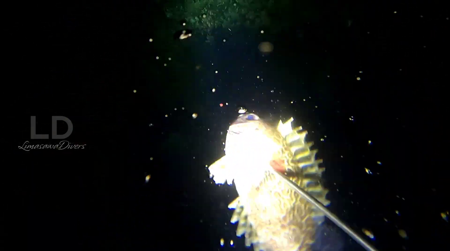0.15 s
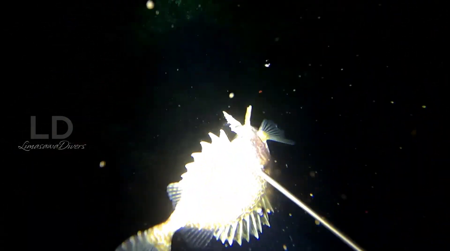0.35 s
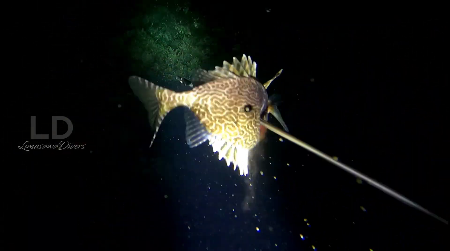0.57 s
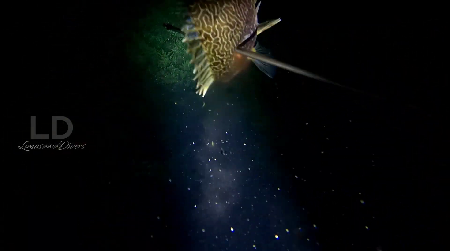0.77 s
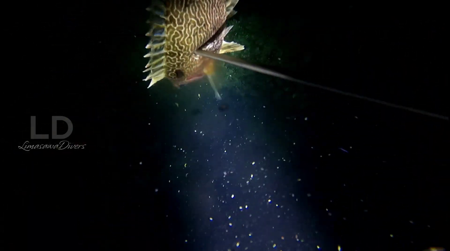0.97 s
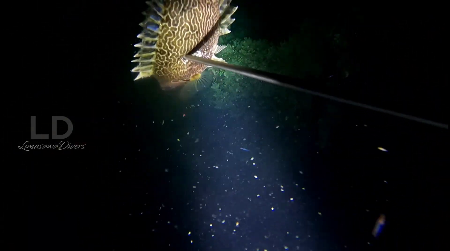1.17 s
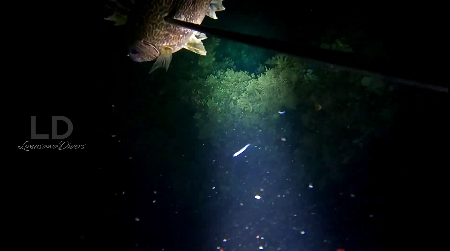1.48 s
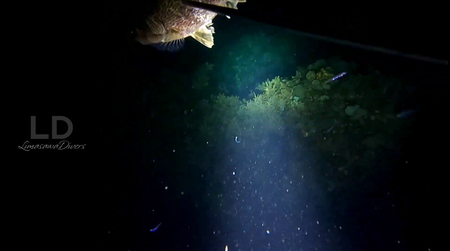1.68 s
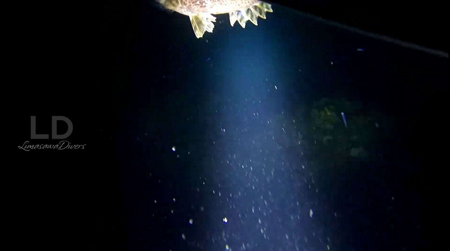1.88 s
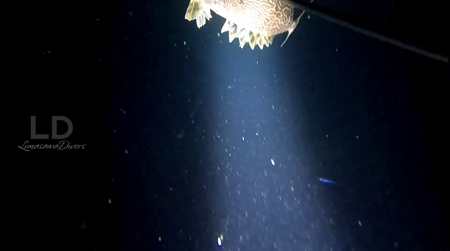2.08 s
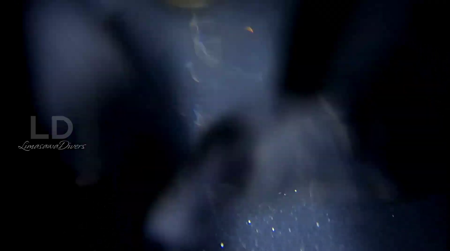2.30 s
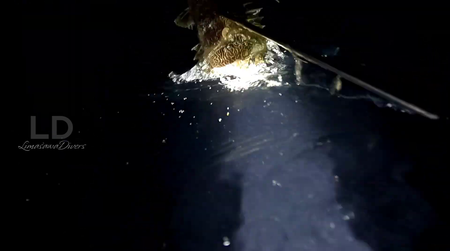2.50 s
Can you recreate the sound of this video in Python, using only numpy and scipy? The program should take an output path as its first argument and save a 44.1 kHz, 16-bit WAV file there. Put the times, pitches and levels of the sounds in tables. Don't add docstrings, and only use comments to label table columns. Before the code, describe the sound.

Close, dull underwater handling noise: deep swelling rumble and bubbles first, quiet fizz with scattered ticks in the middle, then quick squeaky rubs, hollow glugs, a lull and crisp wet pops as the surface breaks.

```python
import sys
import numpy as np
from scipy import signal
from scipy.fft import rfft, irfft, next_fast_len
from scipy.io import wavfile
from scipy.ndimage import map_coordinates

SR = 44100
rng = np.random.default_rng(int(sys.argv[2]) if len(sys.argv) > 2 else 0)


def attenuation_scalar(level_db):
    decades = np.asarray(level_db, float) / 20
    return 10 ** decades


def unload_audio(sound):
    columns = np.transpose(np.atleast_2d(sound))
    steps = np.round(np.clip(columns, -1, 1) * 32767)
    wavfile.write(sys.argv[1], SR, steps.astype(np.int16))


N = 116865
T = np.arange(N) / SR

# [t/s, fizz level/dB, air pocket over fizz/dB, slosh over fizz/dB]
WASH = [(0, -52.5, -2, -22), (.08, -53.5, -5, -29), (.2, -46, -11, -16), (.3, -48, -13, -20),
        (.45, -54, -13.5, -22), (.78, -57.5, -8.5, -22), (1.0, -58, -20, -27.5), (1.45, -55.5, -30.5, -28),
        (1.68, -51.5, -14, -14), (1.78, -54, -22, -34), (1.95, -52, -3.5, -4.5), (2.04, -55.5, -17, -17),
        (2.12, -58, -12.5, -15), (2.2, -61, -33, -28.5), (2.48, -62, -29, -32), (2.6, -54, -15, -17.5)]
SNAP_T60_S = 0.013


def unit(x):
    return x / np.sqrt(np.mean(x ** 2) + 1e-20)


def along(points, hz):
    f, value = np.transpose(points)
    return np.interp(np.log(hz + 1), np.log(f + 1), value)


def curves(rows):
    s, *columns = np.transpose(rows)
    return [np.interp(T, s, column) for column in columns]


def wobble(rate, size=N):
    return map_coordinates(rng.standard_normal(N // 8), [np.arange(size) * rate / SR])


def filtered(x, response):
    m = next_fast_len(N + SR // 2)
    return irfft(rfft(x, m) * response(np.fft.rfftfreq(m, 1 / SR)), m)[..., :N]


def modes(x, table):
    def response(f):
        total = 0
        for k, (center, width, db) in enumerate(table):
            damping = 1j * f * width
            total = total + (-1) ** k * attenuation_scalar(db) * damping / (center * center - f * f + damping)
        return total
    return filtered(x, response)


def add(track, s, sound):
    part = track[..., round(s * SR):][..., :sound.shape[-1]]
    part += sound[..., :part.shape[-1]]


def stroke(length, edge_s):
    t = np.arange(round(length * SR)) / SR
    return t, np.clip(np.minimum(t, length - t) / edge_s, 0, 1)


def swell():
    # [t/s, level/dB]
    swell_levels = [(0, -27), (.13, -34.5), (.21, -15.5), (.46, -17.5), (.58, -39.5), (.7, -28.5),
                    (.8, -36), (1.0, -26), (1.22, -31.5), (1.35, -22.5), (1.47, -29), (1.55, -20),
                    (1.73, -15.5), (1.82, -23), (1.95, -17), (2.07, -36), (2.3, -31.5), (2.65, -32.5)]
    pitch_hz = 31 * (1 + 0.2 * wobble(16))
    tone = np.sqrt(2) * np.sin(2 * np.pi * np.cumsum(pitch_hz) / SR)
    membrane = [(31.2, 22.0, 0)]
    lumps = unit(modes(modes(rng.standard_normal(N), membrane), membrane))
    return attenuation_scalar(curves(swell_levels)[0] + 1.64 * wobble(36.25)) * (tone + attenuation_scalar(-9) * lumps)


def crackling_wash():
    t = np.arange(SR // 16) / SR
    grains_per_s, spread_db, tint_db = 290, 2.5, 5
    spikes = (rng.random(N) < grains_per_s / SR) * attenuation_scalar(spread_db * rng.exponential(size=N))
    tint = attenuation_scalar(tint_db * np.array([wobble(74), wobble(59.75), wobble(66.0)]))
    grains = signal.fftconvolve(spikes, attenuation_scalar(-90 * t / SNAP_T60_S))[:N] * tint
    envelope = attenuation_scalar(1.7 * wobble(24.86)) + attenuation_scalar(-2) * unit(grains)
    wash = attenuation_scalar(curves(WASH)[0] + 7.0) * envelope * rng.standard_normal((3, N))
    wash[0] *= attenuation_scalar(-2 + 2 * wobble(18))
    return wash


def gurgle():
    # [f/Hz, width/Hz, level/dB]
    pocket = [(610, 108, 0), (765, 180, -2)]
    # [f/Hz, density level/dB per Hz]
    slosh_spectrum = [(26, -23), (45, -2), (52, -27), (64, -30), (205, -21.5), (550, -40.5), (720, -79),
                      (1210, -120)]
    # [t/s, level/dB, f/Hz, life/cycles]
    bubbles = [(0.137, -16.5, 1355, 4), (.15, -21, 665, 5.7), (.182, -21.5, 338, 17.4),
               (.193, -24, 670, 16), (0.199, -25.5, 1387, 37), (0.21, -26, 1350, 13),
               (0.33, -15.5, 680, 10.2), (.11, -29, 148, 4), (.333, -24, 1390, 15), (0.336, -17, 2830, 35),
               (0.775, -40, 1453, 32), (0.921, -33, 135, 1.7), (2.121, -26, 101, 1.9),
               (0.343, -19, 341, 13), (0.355, -26, 1418, 21), (.366, -27.5, 1500, 9),
               (0.379, -36, 1300, 12), (0.355, -20, 222.6, 15), (.366, -17.5, 317, 9.7),
               (0.411, -23.5, 313, 4.5), (.612, -36.5, 682, 17), (.615, -44.5, 1121, 46),
               (.718, -32.5, 706, 27), (1.076, -40.5, 161, 3.8), (1.601, -21.5, 189, 2.87),
               (1.65, -18, 300, 1.6), (1.657, -8.5, 270, 2.1), (1.662, -14.5, 330, 2.3),
               (1.669, -1, 586, 1.7), (1.681, -12.5, 57, 3.3), (1.85, -32, 300, 5.8),
               (1.897, -5, 437, 1.08), (1.903, -23, 117, 4.7), (2.516, -20, 4280, 24),
               (2.519, -34, 4100, 74), (2.549, -8.5, 5770, 27), (2.549, -21, 2760, 10),
               (2.549, -29, 149, 3.5), (2.554, -26.5, 460, 4.7), (2.623, -18.5, 1380, 6.4),
               (2.64, -32, 3210, 16.6)]
    fizz_db, pocket_db, slosh_db = curves(WASH)
    blip_db = 3

    blips = attenuation_scalar(blip_db * wobble(70)) * rng.standard_normal(N)
    hum = unit(modes(modes(blips, pocket), [(686, 1000, 0)]))
    out = attenuation_scalar(fizz_db + pocket_db + 13.5 + 3.1 * wobble(11)) * hum

    slosh = unit(filtered(rng.standard_normal(N), lambda f: attenuation_scalar(along(slosh_spectrum, f))))
    out += attenuation_scalar(fizz_db + slosh_db + 31.5 + blip_db * wobble(30.05)) * slosh

    for s, db, hz, cycles in bubbles:
        u = np.arange(round(2 * cycles / hz * SR)) / SR * hz
        envelope = attenuation_scalar(db - 26 * u / cycles) * (1 - np.exp(-u / 0.22)) ** 2
        rise = 1 + 0.01 * u / cycles
        add(out, s, envelope * np.sin(2 * np.pi * u * rise))
    return out


def impacts():
    # [t/s, peak level/dB, mid level/dB, treble level/dB]
    snaps = [(0.0426, -30.5, 17.5, 8.5), (0.12, -24.5, 7.5, 2), (0.2876, -34, 8.5, -12),
             (0.9899, -38, 8, 12), (1.3624, -44, 16.5, 14), (1.3912, -27.5, 10, -2.5),
             (1.6373, -27, 6, -19), (1.8489, -33, 9, -27), (1.8979, -17.5, -31, -16),
             (1.9847, -18, -2.5, 3.5), (2.5154, -20, -7, -8), (2.5485, -14, 5, -5.5), (2.609, -25, 0, -4)]
    # [t/s, peak level/dB, treble level/dB]
    ticks = [(0.0144, -38, 12), (0.0954, -31.5, -24), (0.1841, -27, -16), (0.3165, -34.5, 10),
             (0.3375, -18.5, 6), (0.5116, -48.5, 22), (0.6575, -40.5, 12), (0.7563, -45, 16.5),
             (0.8034, -34.5, 4), (0.8622, -35.5, 9), (1.078, -39.5, 10.5), (1.1071, -36.5, 8),
             (1.154, -41.5, 9.5), (1.1932, -39.5, 10.5), (1.4265, -35.5, 11.5), (2.021, -33, 9),
             (2.172, -35, 4.5), (2.23, -37.5, 6), (2.2563, -46, 19.5), (.0075, -48, 15.5), (.0762, -55, 14),
             (0.141, -28, 3), (0.2152, -39, 15), (0.29, -34, 6), (0.379, -42, 13), (.427, -46.5, 13),
             (0.4738, -48, 13.5), (.52, -36, 4), (.6434, -50, 16), (0.893, -50.5, 12), (.909, -53, 19),
             (0.9187, -50, 16), (0.9433, -44.5, 9.5), (0.964, -49, 17), (1.0435, -51, 17.5),
             (1.088, -39.5, 11.5), (1.1413, -43, 10.5), (1.2, -47, 13), (1.227, -34.5, -5),
             (1.2455, -52, 13), (1.344, -56, 22), (1.41, -37.5, 9), (1.615, -54, 19), (1.7384, -41, 6),
             (1.7624, -36, -1), (2.0497, -41.5, 4), (2.0956, -42.5, 8), (2.147, -52, 8), (2.279, -54, 17),
             (2.287, -55, 19.5), (2.335, -49, 13), (2.365, -49, 4), (2.373, -42.5, 5), (2.424, -43, 1),
             (2.58, -65, 10), (2.595, -47, -8)]
    force, t = np.zeros((4, N)), np.arange(SR // 16) / SR
    ring_db, ring_t60_s = -16, 0.05
    fade = attenuation_scalar(-60 * t / SNAP_T60_S) + attenuation_scalar(ring_db - 60 * t / ring_t60_s)
    blows = [*snaps, *[(s, db, high_db / 2, high_db) for s, db, high_db in ticks]]
    for s, db, mid_db, high_db in blows:
        gains = attenuation_scalar(db + 5 + np.array([[-high_db / 2], [0], [mid_db], [high_db]]))
        add(force, s, gains * fade * np.sign(rng.standard_normal(len(t))))
    return force


def rubs():
    # [t/s, length/s, level/dB, mid level/dB, treble level/dB]
    scrapes = [
        (0.174, 0.063, -48, -10, -27),
        (0.331, 0.012, -30.5, 1, -29),
        (1.506, 0.029, -38, 1.5, -11),
        (1.559, 0.017, -44.5, 3, -14),
        (1.575, 0.03, -43.5, 17.5, 7),
        (1.653, 0.023, -40.5, -8, 4),
        (1.659, .038, -31.5, -2.5, -21),
        (1.779, 0.057, -39.5, 12.5, 5),
        (1.927, 0.075, -53, -5, 0),
    ]
    force, edge = np.zeros((4, N)), 0.25
    for s, length, db, mid_db, high_db in scrapes:
        t, envelope = stroke(length * (1 + edge), length * edge)
        grit = attenuation_scalar(2.0 * wobble(582, size=len(t))) * rng.standard_normal((4, len(t)))
        gains = attenuation_scalar(db + 14.5 + np.array([[5], [0], [mid_db], [high_db]]))
        add(force, s - length * edge / 2, gains * envelope * grit)
    return force


def squeaks():
    # [t/s, length/s, level/dB, first f/Hz, last f/Hz]
    glides = [(0.399, 0.038, -51.5, 3000, 2980), (1.506, 0.0101, -21.5, 1734, 1540),
              (1.515, 0.021, -25, 1038, 1097), (1.57, 0.0163, -26, 3116, 2350),
              (1.572, 0.011, -26.5, 3076, 3567), (1.585, 0.01096, -18.5, 2257, 1273),
              (1.593, 0.01085, -18, 1283, 827), (1.599, 0.0091, -17.5, 729, 610),
              (1.663, 0.0101, -17.5, 1278, 1665), (1.66, 0.016, -37, 7470, 7240),
              (1.675, 0.02, -36, 6140, 7270), (1.777, 0.034, -24, 1417, 2026),
              (1.781, 0.0197, -25, 2885, 3790), (1.806, 0.014, -23, 2860, 3170),
              (1.807, 0.0162, -28, 2146, 2550), (1.814, 0.02, -30.5, 1380, 1864),
              (1.818, 0.017, -31, 3100, 3000), (1.926, 0.043, -51, 3610, 3600),
              (1.927, 0.0196, -45.5, 3080, 3170), (1.93, 0.046, -42, 1143, 1125)]
    overtone_db, flutter_db, jitter = -12, 2, 0.03
    out = np.zeros(N)
    for s, length, db, first_hz, last_hz in glides:
        t, envelope = stroke(length, 0.0018)
        hz = first_hz * (last_hz / first_hz) ** (t / length) * (1 + jitter * wobble(889, size=len(t)))
        phase = 2 * np.pi * np.cumsum(hz) / SR
        tone = np.zeros(len(t))
        for k in range(3):
            flutter = flutter_db * wobble(387, size=len(t))
            tone += attenuation_scalar(overtone_db * k + flutter) * np.sin((k + 1) * phase)
        add(out, s, attenuation_scalar(db) * envelope * tone)
    return out


def stiff(x):
    first_hz = 1127
    return filtered(x, lambda f: (f * f / (f * f - first_hz ** 2 - 1j * f * first_hz)) ** 2)


def housing(force):
    # [f/Hz, width/Hz, level/dB]
    body_modes = [(550, 1680, -3)]
    low_modes = [(1423, 252, 3.5), (1970, 590, -3)]
    mid_modes = [(2400, 5400, -44), (3000, 570, -3), (3830, 345, -17)]
    high_modes = [(4440, 745, -5), (6450, 355, -4), (6910, 1180, -7.5)]
    body, low, mid, high = force
    jolt = modes(modes(body, body_modes), body_modes)
    return jolt + stiff(modes(high, high_modes) - modes(low, low_modes) - modes(mid, mid_modes))


def membrane_loss(x):
    return filtered(x, lambda f: 1 / (1 + 1j * f / 10220) ** 5)


def ports(x):
    # [f/Hz, left over right/dB]
    louder = [(200, 0.46), (1200, 3), (3300, 4), (5200, -2), (9000, 0.5)]
    # [f/Hz, phase lead/rad]
    leads = [(60, 0.044), (220, -0.11), (860, -0.64), (1210, -0.44), (2670, -1.26), (3620, -1.42),
             (4390, -0.81), (5770, 0.38)]
    # [f/Hz, level/dB]
    apart = [(100, -27), (1500, -15), (5000, -6.5), (9000, -23.5), (14000, -13)]
    side = np.array([[.5], [-.5]])
    pair = filtered(x, lambda f: attenuation_scalar(side * along(louder, f)) * np.exp(1j * side * along(leads, f)))
    slow = np.array([wobble(8.03), wobble(7.4)])
    fast = np.array([wobble(250), wobble(250)])
    bass = filtered(x, lambda f: f < 300)
    rattle = bass * slow + (x - bass) * fast
    return pair + filtered(rattle, lambda f: attenuation_scalar(along(apart, f)))


def scene():
    force = impacts() + rubs()
    force[1:] += crackling_wash()
    inside = housing(force) + squeaks() + gurgle()
    return ports(membrane_loss(inside) + swell())


def capsule_hiss(shape):
    # [f/Hz, width/Hz, level/dB]
    hiss_band = [(8300, 13000, -69.5)]
    noise = attenuation_scalar(4.5 * wobble(70)) * rng.standard_normal(shape)
    hiss = modes(modes(noise, hiss_band), [(8000, 14000, 0.02)])
    return filtered(hiss, lambda f: 1 / (1 + (f / 13400) ** 10))


def low_pass(x):
    return signal.sosfilt(signal.butter(12, 15520, fs=SR, output="sos"), x)


def record(dry):
    return low_pass(dry + capsule_hiss(dry.shape))


dry = scene()
out = record(dry)
unload_audio(out)
```